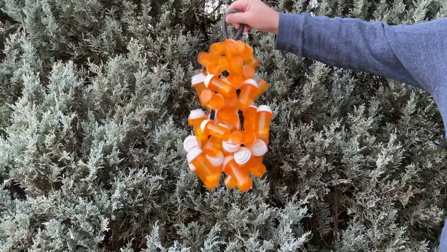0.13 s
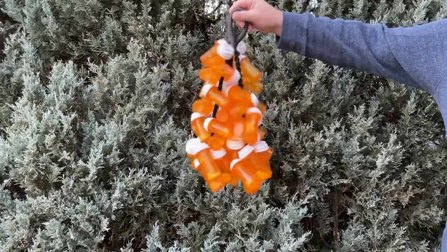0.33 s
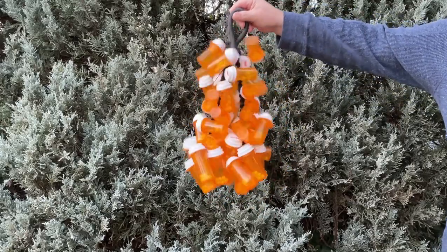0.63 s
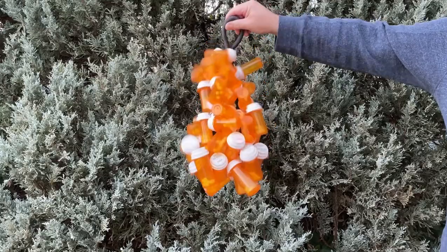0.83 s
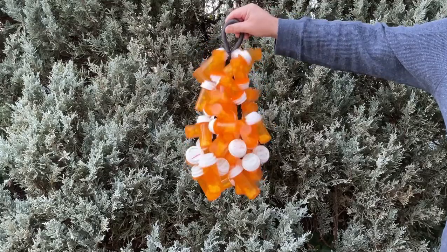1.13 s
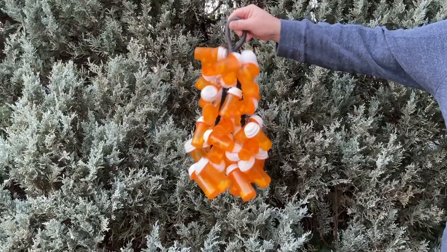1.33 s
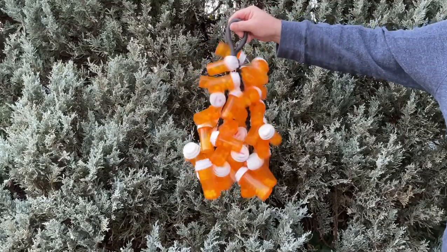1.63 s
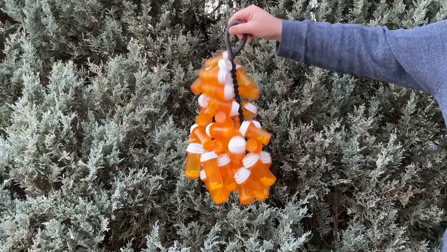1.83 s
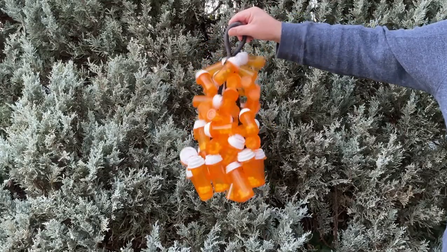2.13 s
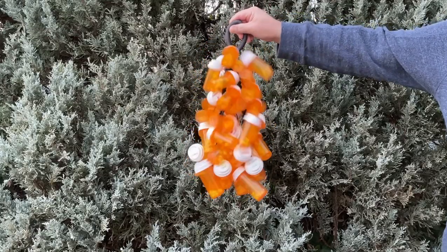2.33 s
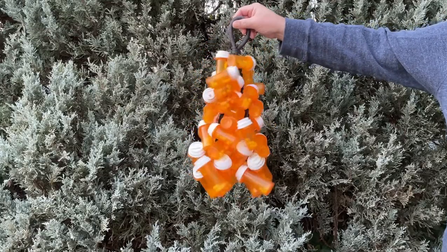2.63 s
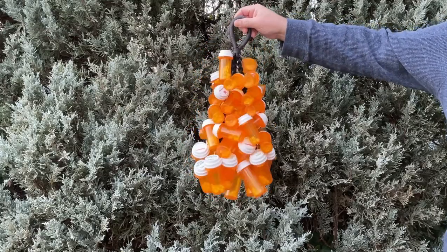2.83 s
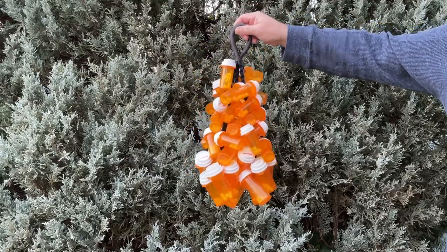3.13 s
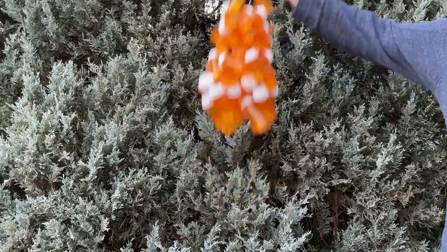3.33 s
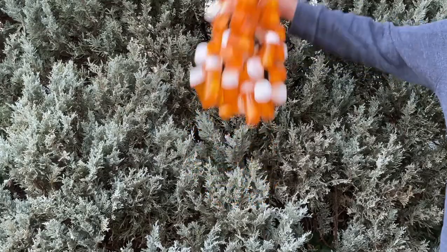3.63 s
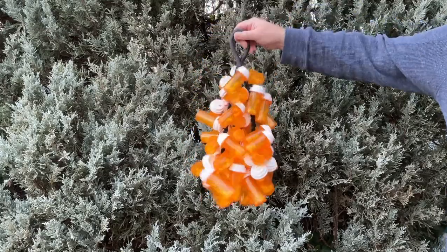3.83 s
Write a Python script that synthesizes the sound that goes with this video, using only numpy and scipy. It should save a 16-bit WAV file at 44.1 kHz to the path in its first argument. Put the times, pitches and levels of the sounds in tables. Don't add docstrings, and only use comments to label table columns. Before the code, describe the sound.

Dense bright rattle of bead-filled plastic bottles shaken by hand, fading, then one hard clattering drop

```python
import sys
import numpy as np
from scipy import signal
from scipy.fft import rfft, irfft
from scipy.io import wavfile

SR = 44100
rng = np.random.default_rng(int(sys.argv[2]) if len(sys.argv) > 2 else 0)


def wav_out(sig):
    wavfile.write(sys.argv[1], SR, np.round(np.clip(np.atleast_2d(sig).T, -1, 1) * 32767).astype(np.int16))


def voltage_ratio(level):
    return 10 ** (np.asarray(level, float) / 20)


N = 176400

# time in seconds, level in dB.
MOTION = [(0, -44), (1.2, -43.5), (2.4, -46), (2.72, -46), (2.8, -51.5), (2.91, -58.5), (2.99, -68.5),
          (3.05, -67), (3.11, -71.5), (3.3, -85), (3.46, -79), (3.55, -59), (3.65, -46.5), (3.695, -47),
          (3.74, -34), (3.785, -32.5), (3.845, -41), (4.0, -53)]
# frequency in Hz, level in dB.
WALL_COLOUR = [(250, -24), (720, -15.5), (2300, -7), (4750, -2.5), (5490, -5.5), (10400, -16.5),
               (14300, -26), (15700, -39.5)]
GENTLE_DB = -50.5


def evened(x):
    return x / np.sqrt(np.mean(x ** 2) + 1e-20)


def read(points, hz):
    f, value = np.transpose(points)
    return np.interp(np.log(hz + 1), np.log(f + 1), value)


def causal(points, size=1024):
    log_gain = np.log(voltage_ratio(read(points, abs(np.fft.fftfreq(size, 1 / SR)))))
    response = np.fft.ifft(np.exp(np.conj(signal.hilbert(log_gain)))).real
    return response[:size // 2]


def arm_db():
    return np.interp(np.arange(N) / SR, *np.transpose(MOTION))


def surge_db(t):
    # time in seconds, surge in dB.
    jolts = [(0.015, 0), (0.108, -4.5), (0.289, 1.5), (0.484, 0), (0.763, -1), (0.891, 2.5), (0.958, -0.5),
             (1.098, 0), (1.236, 1), (1.402, 1), (1.502, 1.5), (1.646, 1), (1.706, 2.5), (1.871, 0.5),
             (2.043, 2), (2.218, 5), (2.341, 3), (2.569, 1.1)]
    rise_s, fall_s = 0.051, 0.036
    return sum(db * np.exp(-((t - s) / np.where(t < s, rise_s, fall_s)) ** 2) for s, db in jolts)


def ring(hz, t60, rise=0.0002, size=1200):
    t = np.arange(size) / SR
    build_up = 1 - np.exp(-t / rise)
    decay = np.exp(-np.log(1000) * t / t60)
    return build_up * decay * np.sin(2 * np.pi * hz * t)


def crack(noise, t60):
    t = np.arange(len(noise)) / SR
    spray = noise * np.exp(-np.log(1000) * t / t60)
    snap = np.arange(len(noise)) == 0
    return spray / np.linalg.norm(spray) + 0.49 * snap


def shower(level_db, per_s, spread_db, shapes):
    chance, size, pick = rng.random((3, N))
    crowd = voltage_ratio(0.2 * (np.minimum(level_db, -34) - GENTLE_DB)) ** 2
    hits = chance < crowd * per_s / SR
    force = voltage_ratio(-spread_db * np.log(np.maximum(size, .006))) * hits / np.sqrt(crowd)
    pick = (pick * len(shapes)).astype(int)
    out = sum(signal.oaconvolve(force * (pick == k), shape)[:N] for k, shape in enumerate(shapes))
    return evened(out) * voltage_ratio(level_db)


def beads():
    # frequency in Hz, share in dB, 60 dB decay time in seconds.
    bottle_rings = [(761, -24, 0.018), (2880, -13.5, 0.018), (3530, -8.5, 0.015), (4150, -6.5, 0.016),
                    (4500, -7, 0.0066), (4800, -5, 0.0092), (6440, -9, 0.0076), (8930, -12, 0.0056),
                    (10280, -9.5, 0.0052)]
    arm, wrist = arm_db(), surge_db(np.arange(N) / SR)
    colour = causal(WALL_COLOUR)

    ticks = [np.convolve(crack(noise, 0.0082), colour) for noise in rng.standard_normal((40, 600))]
    tick_db = -2.5 + 0.23 * np.minimum(arm - GENTLE_DB, 0)
    tick_sound = voltage_ratio(tick_db) * shower(arm + wrist, 2600, 3.5, ticks)

    detunes = 1 + 0.036 * rng.uniform(-1.25, 1, (len(bottle_rings), 6))
    tones = []
    for (hz, db, t60), row in zip(bottle_rings, detunes):
        tones += [voltage_ratio(db) * ring(hz * detune, t60) for detune in row]
    ring_sound = voltage_ratio(-7.5) * shower(arm + 1.3 * wrist, 1300, 2.5, tones)

    knocks = [ring(hz, 0.0063) for hz in np.geomspace(680, 2220, 24)]
    knock_sound = voltage_ratio(-22) * shower(arm, 900, 2.5, knocks)
    return tick_sound + ring_sound + knock_sound


def softened(x):
    above_gentle = arm_db() - GENTLE_DB
    low = signal.sosfiltfilt(signal.butter(2, 6940, fs=SR, output="sos"), x)
    return low + (x - low) * voltage_ratio(np.where(above_gentle < 0, 0.79, 0.13) * above_gentle)


def hedge(x):
    t = np.arange(4000) / SR
    tail = rng.standard_normal(4000) * voltage_ratio(-60 * t / 0.043) * (t > .003)
    return signal.oaconvolve(x, tail / np.linalg.norm(tail))[:N]


def hush():
    # frequency in Hz, level per Hz in dB.
    garden_colour = [(25, -6), (120, 1.5), (300, -4), (600, -5), (1500, -10.5), (4400, -19), (9000, -25),
                     (15500, -25.5)]
    z = rfft(rng.standard_normal(N)) * voltage_ratio(read(garden_colour, np.fft.rfftfreq(N, 1 / SR)))
    return voltage_ratio(-77.5) * evened(irfft(z, N))


def tumbles():
    # time in seconds, level in
    # dB, ring in Hz.
    swings = [(0.006, -43, 3970), (0.105, -43, 5000), (0.145, -45, 3700), (0.292, -47, 3950),
              (0.528, -48, 4740), (0.573, -46, 3130), (0.597, -47, 4760), (0.629, -58, 2840),
              (0.657, -51, 4000), (0.779, -43.5, 4870), (0.852, -60, 4600), (0.894, -56, 4300),
              (0.956, -51, 3530), (1.093, -40.5, 4800), (1.194, -41, 4700), (1.233, -53, 3600),
              (1.4, -49, 4700), (1.538, -56, 3460), (1.653, -43, 4650), (1.716, -44.5, 4800),
              (1.766, -45, 4610), (1.834, -59, 2640), (1.888, -46, 4160), (1.945, -48, 2840),
              (2.056, -46, 4500), (2.256, -44, 4050), (2.344, -40.5, 4910), (2.406, -43, 4700),
              (0.189, -44.5, 4800),
        (0.442, -41.5, 4500),
        (2.68, -46, 4800),
        (2.77, -47, 4700),
        (3.035, -71, 4520),
        (3.766, -37, 5710),
        (3.785, -42.5, 3140),
        (3.82, -39.5, 4800),
    ]
    rows = swings
    out, t = np.zeros(N + 20000), np.arange(-6000, 6000) / SR
    for (s, db, hz), (chance, size) in zip(rows, rng.random((len(rows), 2, len(t)))):
        hits = chance < 260 / SR
        force = voltage_ratio(np.log(np.maximum(size, .02))) * hits
        run = evened(signal.oaconvolve(force, ring(hz, 0.0042))[:len(t)])
        at = round(s * SR)
        out[at:at + len(t)] += voltage_ratio(db - 6) * run * np.exp(-(t / 0.052) ** 2)
    return out[6000:6000 + N]


def single_hits(rows, t60, level_db, rise):
    out, colour = np.zeros(N + 2000), causal(WALL_COLOUR)
    for (s, db, hz, crack_db), noise in zip(rows, rng.standard_normal((len(rows), 689))):
        tick = np.convolve(crack(noise, t60), colour)
        tone = ring(hz, t60 * min((4700 / hz) ** 2, 2), rise)
        hit = tone / tone.max() + voltage_ratio(crack_db) * tick / abs(tick).max()
        at = round(s * SR)
        out[at:at + 1200] += voltage_ratio(db + level_db) * hit
    return out[:N]


def strikes():
    # time in seconds, peak in dB, ring in Hz, crack in dB relative to the ring.
    loud_hits = [(0.067, -30.5, 4660, -2), (0.1004, -29, 4760, -9), (0.1035, -27.5, 4700, -3),
                 (0.1107, -29, 4680, -8), (0.1184, -37, 4620, -9), (0.1562, -29, 4800, -5),
                 (0.284, -31, 4000, -7), (0.4783, -29.5, 4770, -9), (0.53, -30, 4800, 0),
                 (0.607, -32, 4750, -8), (0.7008, -35.5, 6800, 1), (0.7464, -35.5, 4720, -9),
                 (0.1735, -38, 9000, 0), (0.9502, -35, 3620, -14), (1.052, -32, 4670, -5),
                 (1.0805, -31, 5000, -2), (1.2208, -40, 3940, -9), (1.2385, -27, 3590, -14),
                 (1.3847, -28, 4700, -6), (1.4024, -31, 4270, -3), (1.4251, -28, 4780, -15),
                 (1.5394, -34, 3550, -21), (1.6369, -34, 4580, -9.5), (1.71, -32, 4805, -9),
                 (1.82, -37.5, 2770, -14), (1.8542, -42, 9500, 3), (1.9972, -33, 5000, -9),
                 (2.1785, -41, 3360, 3), (2.332, -40, 4660, -9.5), (0.2778, -37, 12000, 2)]
    return single_hits(loud_hits, .007, -1.5, .0008)


def pings():
    # time in seconds, peak in dB, ring in Hz.
    near_beads = [(0.0965, -38, 4930), (0.1127, -32, 4590), (0.1283, -31, 4850), (0.1395, -31, 4810),
                  (0.1422, -29, 4890), (0.181, -36, 4900), (0.1893, -34, 4490), (0.1939, -35, 4800),
                  (0.1982, -35, 4660), (0.2253, -35, 3850), (0.2466, -38, 4400), (0.2545, -39, 4620),
                  (0.2671, -33, 4760), (0.2773, -32.5, 4070), (0.3038, -32.5, 3490), (0.3713, -35, 4060),
                  (0.3859, -31, 4540), (0.4135, -31, 4700), (0.44, -30, 4500), (0.4876, -34, 4760),
                  (0.4917, -34, 4950), (0.6472, -34, 4200), (0.764, -35, 4660), (0.8041, -34, 4640),
                  (0.8365, -37, 4620), (0.8784, -41, 4600), (0.9566, -32, 4540), (0.9867, -36, 4600),
                  (1.0229, -29, 4520), (1.0578, -35, 4700), (1.0613, -36, 5120), (1.0987, -36, 4880),
                  (1.1119, -34, 4790), (1.1335, -40, 4690), (1.1823, -32, 5100), (1.1859, -36, 4810),
                  (1.27, -35, 3650), (1.4132, -31, 4320), (1.484, -38, 4400), (1.5692, -36, 4390),
                  (1.6012, -33, 4620), (1.641, -31, 4700), (1.7047, -30, 4740), (1.7513, -35, 4670),
                  (1.7974, -42, 4770), (1.8546, -35, 5160), (1.8985, -33, 4340), (2.0572, -34, 4790),
                  (2.1176, -37, 4410), (2.1368, -39, 4350), (2.1636, -36, 4590), (2.1791, -30, 6090),
                  (2.2199, -38, 3600), (2.3424, -34, 5160), (2.3573, -35, 4860), (2.3676, -37, 4860),
                  (2.3936, -35, 4840), (2.4449, -36, 4670), (2.6478, -38, 4740), (2.6649, -40, 4780)]
    return single_hits([(*row, -8) for row in near_beads], .006, -3, .0008)


def puff():
    low = signal.sosfilt(signal.butter(2, 180, fs=SR, output="sos"), rng.standard_normal(N))
    swell = np.exp(-((np.arange(N) / SR - 1.63) / .06) ** 2)
    return voltage_ratio(-78) * evened(low) * swell


def strays():
    # time in seconds, peak in dB, ring in Hz, crack in dB relative to the ring.
    lone_hits = [(2.888, -49.5, 3540, 6), (3.0086, -64, 4680, -3), (3.0374, -56, 4860, -7),
                 (3.0488, -53, 4120, -11), (3.059, -52, 4140, -12), (3.1037, -67.5, 4280, 14),
                 (3.1403, -50.5, 1940, 5), (3.1577, -58.5, 4670, 2), (3.1614, -59, 4170, 12),
                 (3.1649, -66, 3440, 12), (3.1725, -60, 4600, 10), (3.1794, -62, 4830, 12),
                 (3.182, -55, 5350, 0), (3.1852, -61, 4500, 15.5), (3.1893, -56, 4570, 5),
                 (3.2014, -68, 4250, 3), (3.2296, -60, 2000, 2), (3.236, -54, 4200, 5),
                 (3.2914, -79, 1980, -5.5), (3.3757, -66, 4380, 0), (3.382, -77, 2450, 4),
                 (3.4164, -66, 4260, 3), (3.4737, -62, 2990, 4), (3.4965, -73, 4730, -3),
                 (3.5014, -70, 4600, -7), (3.5165, -53.5, 4150, 6), (3.5314, -57.5, 4570, 12),
                 (3.5553, -63, 2640, -1.5), (3.6591, -45, 3850, 8), (3.966, -46, 4890, -7.5)]
    lone = single_hits(lone_hits, .004, -1, .0002)
    return (lone + softened(lone)) / 2


def clacks():
    # time in seconds, peak in dB, ring in Hz.
    landings = [(3.712, -39, 4830), (3.715, -34, 4840), (3.7179, -35, 4700), (3.7213, -28, 5000),
                (3.7275, -29, 5140), (3.7401, -32, 4360), (3.7453, -26.5, 4580), (3.7505, -24, 5000),
                (3.7558, -29, 3880), (3.7596, -27, 4720), (3.7719, -26, 5810), (3.7749, -27, 3670),
                (3.7777, -25, 3310), (3.7848, -26.5, 2650), (3.7872, -33, 3500), (3.7908, -27, 3850),
                (3.7945, -27, 5000), (3.7974, -28, 3400), (3.8156, -31, 4440), (3.8196, -32, 3830),
                (3.8254, -29, 4750), (3.8308, -29, 3420)]
    return single_hits([(*row, -5) for row in landings], .004, -1, .0008)


def scene():
    rattle = softened(beads()) + tumbles() + strikes() + pings() + strays() + clacks()
    rattle = signal.sosfilt(signal.butter(4, 230, "high", fs=SR, output="sos"), rattle)
    return (rattle + voltage_ratio(-13.5) * hedge(rattle) + hush() + puff())[None]


def band_limit(x):
    return signal.sosfilt(signal.butter(12, 15700, fs=SR, output="sos"), x)


def record(dry):
    return band_limit(dry)


dry = scene()
out = record(dry)
wav_out(out)
```